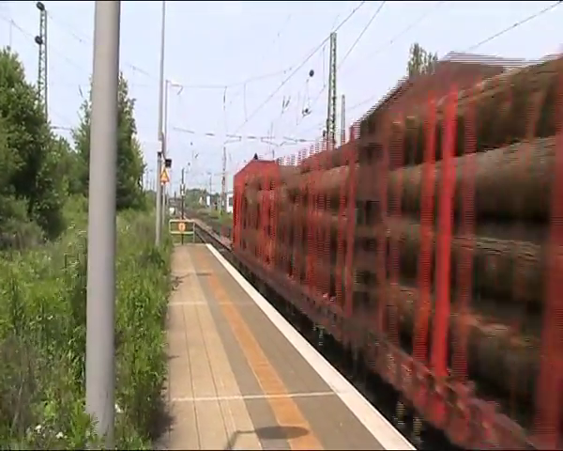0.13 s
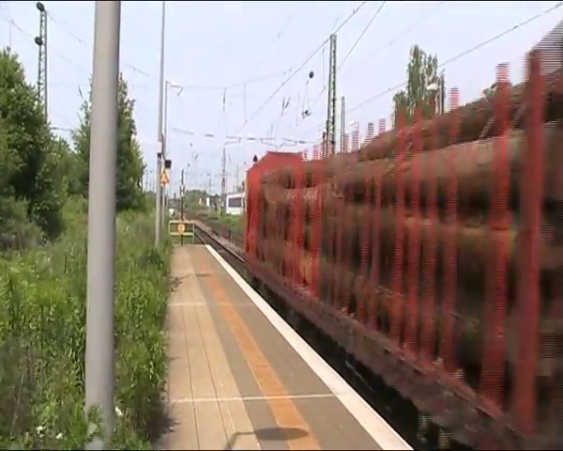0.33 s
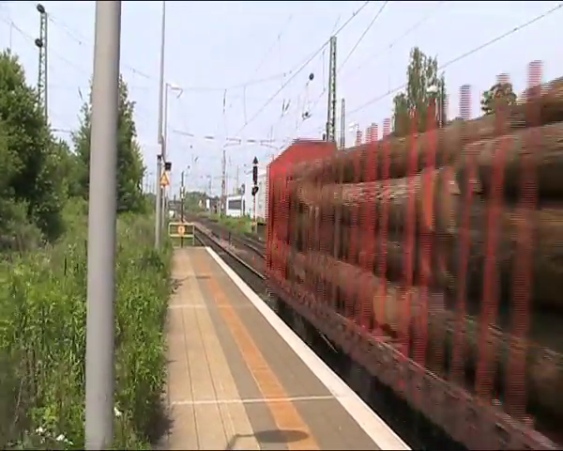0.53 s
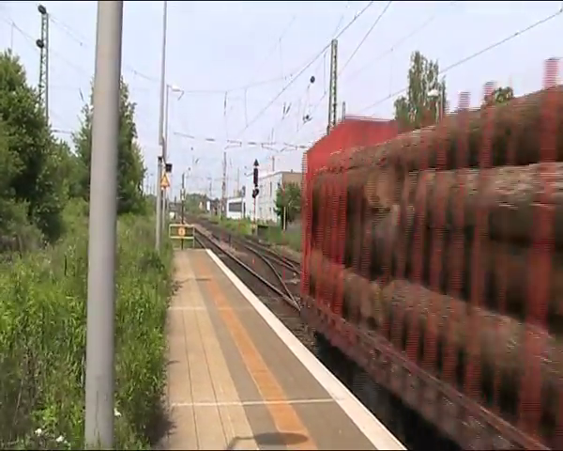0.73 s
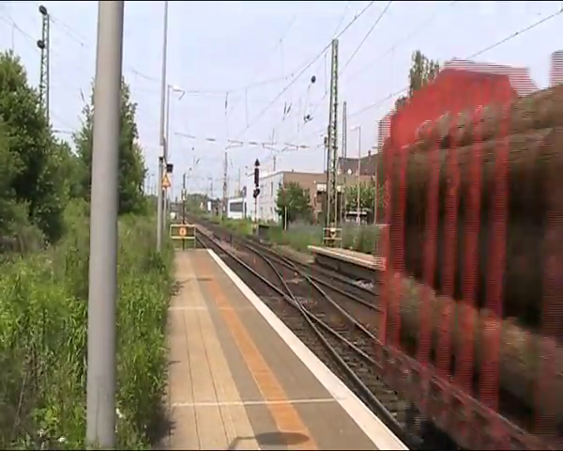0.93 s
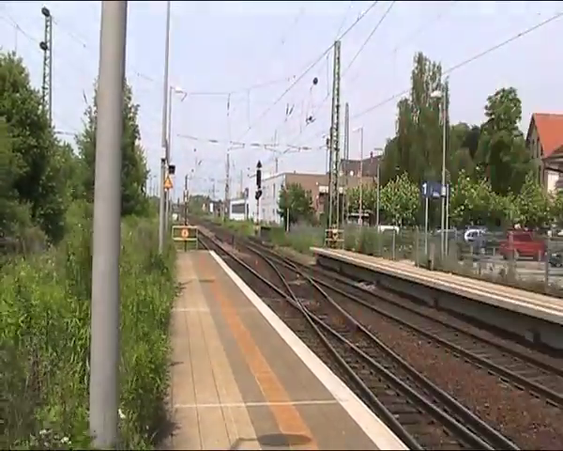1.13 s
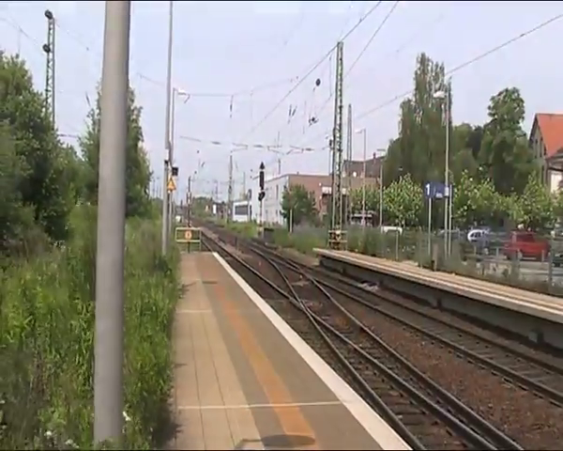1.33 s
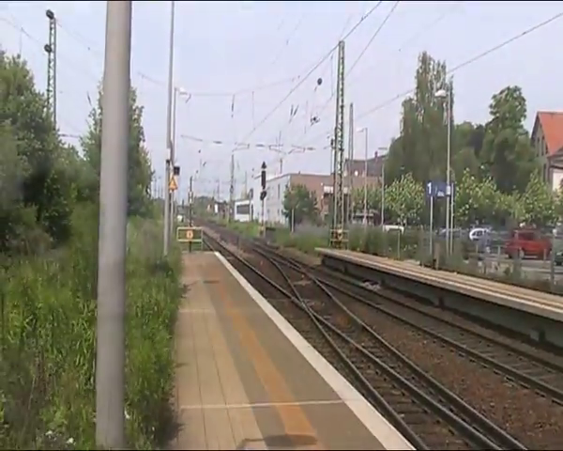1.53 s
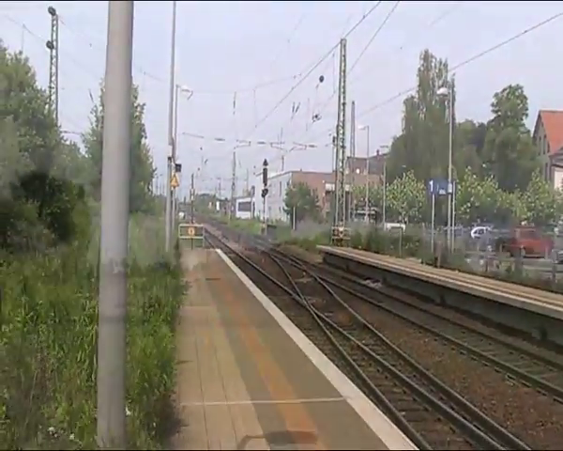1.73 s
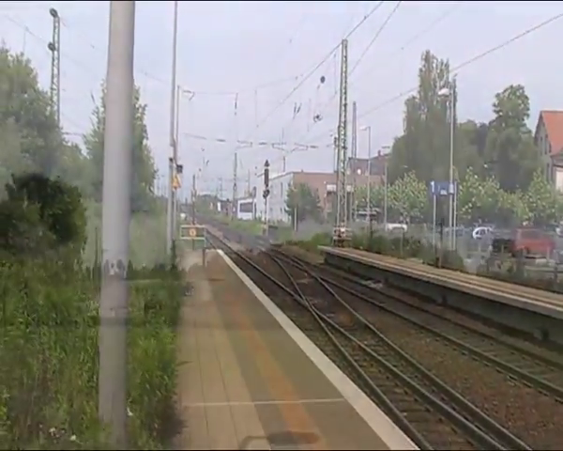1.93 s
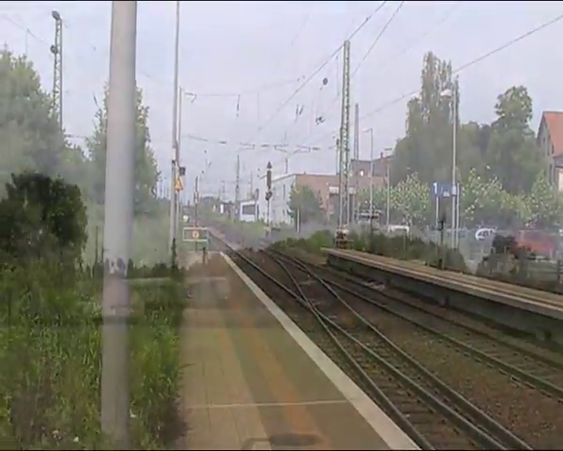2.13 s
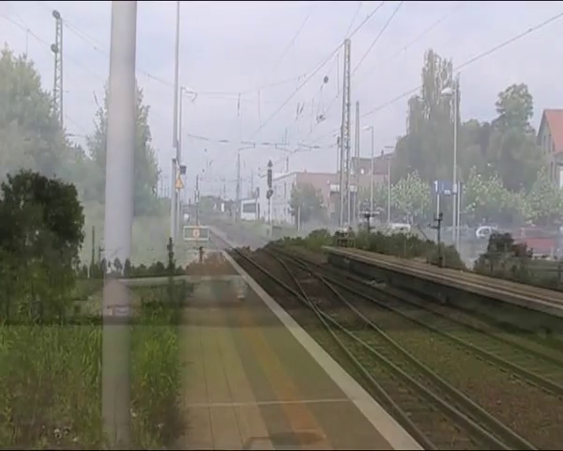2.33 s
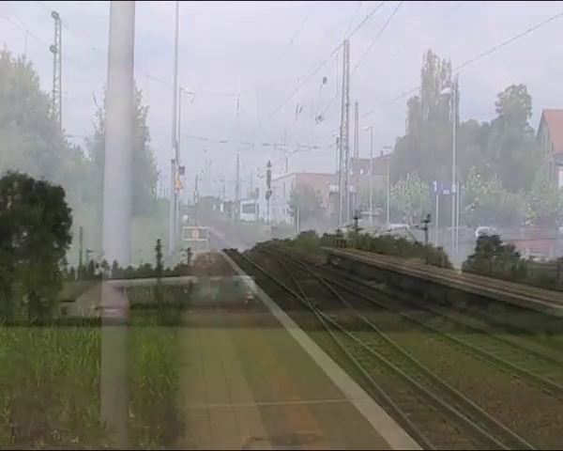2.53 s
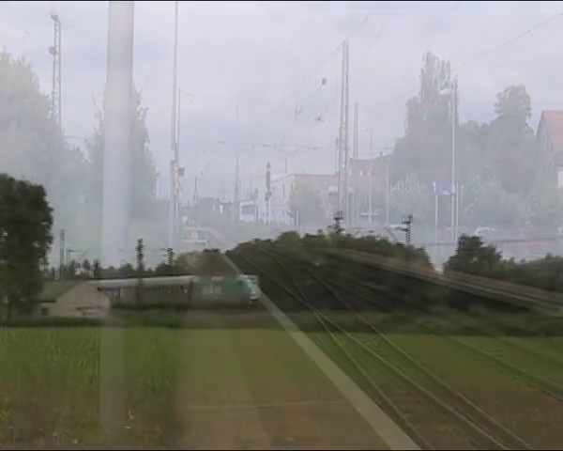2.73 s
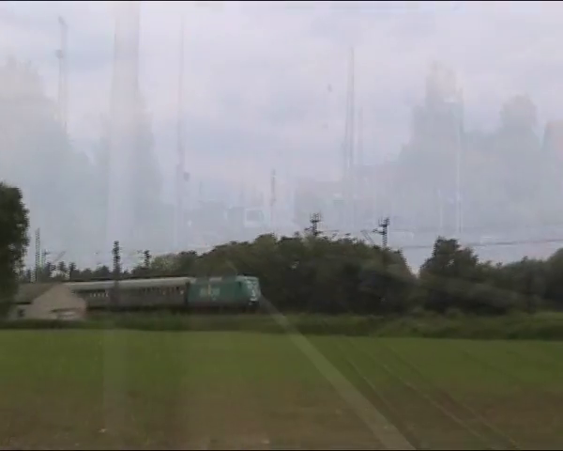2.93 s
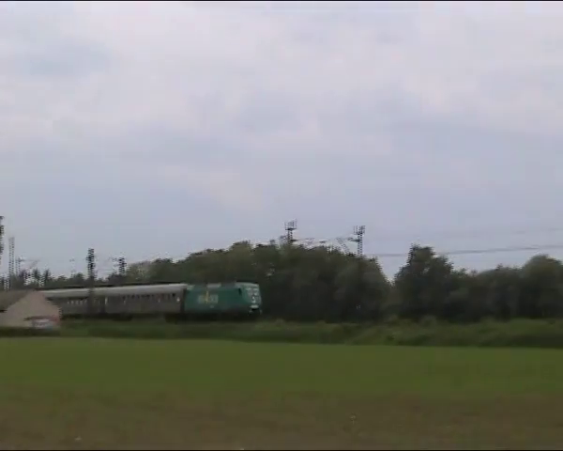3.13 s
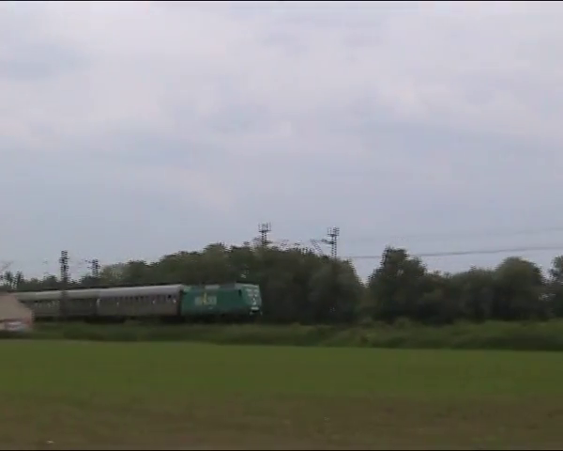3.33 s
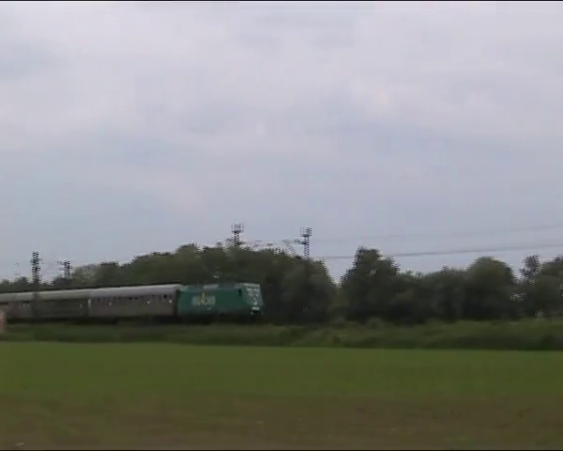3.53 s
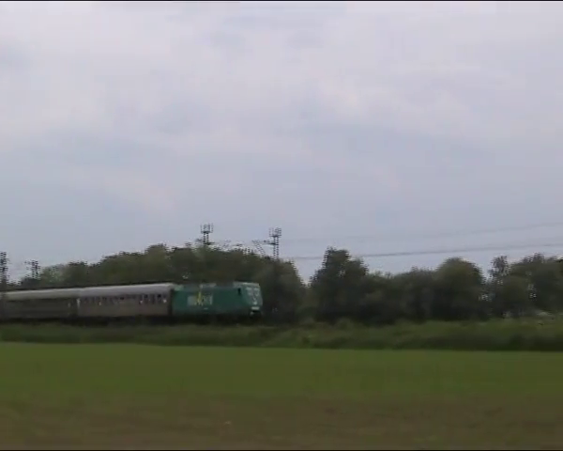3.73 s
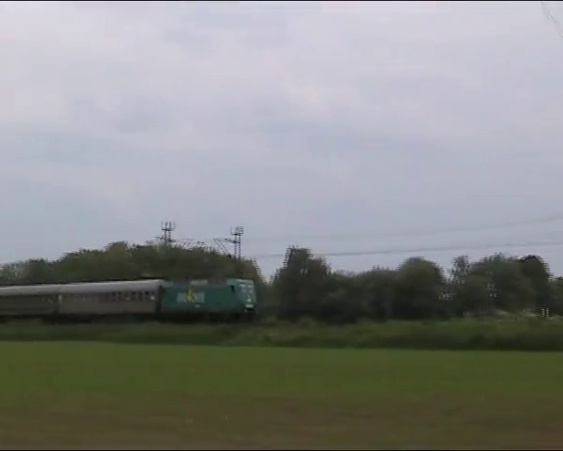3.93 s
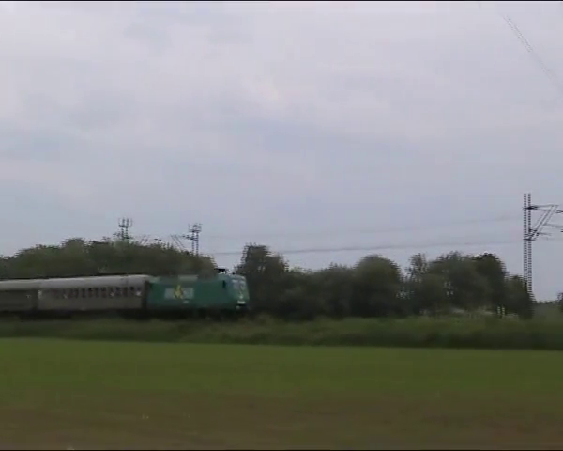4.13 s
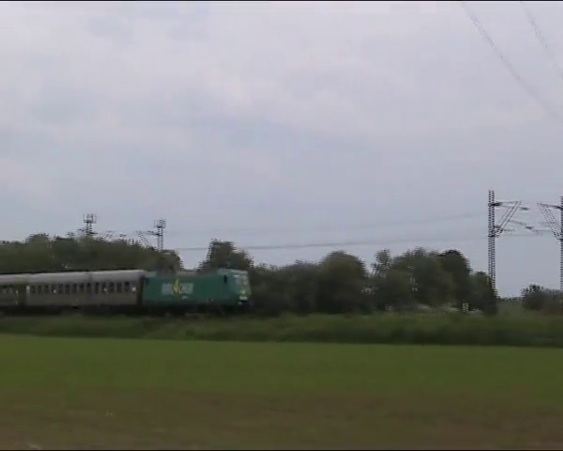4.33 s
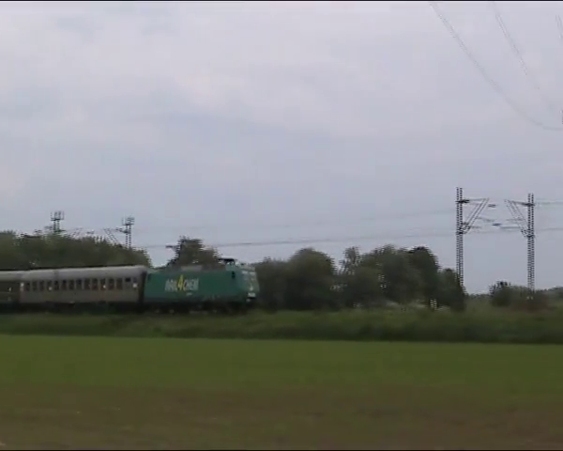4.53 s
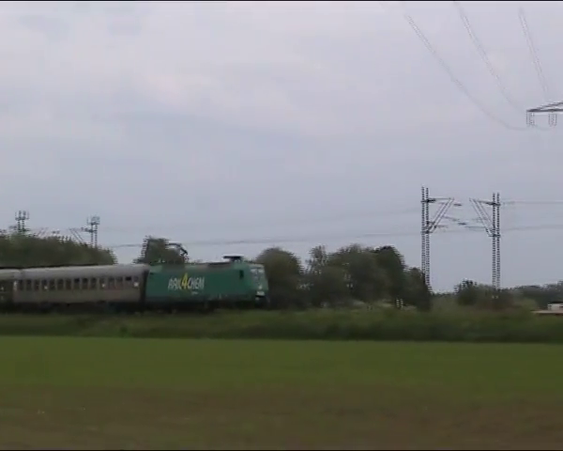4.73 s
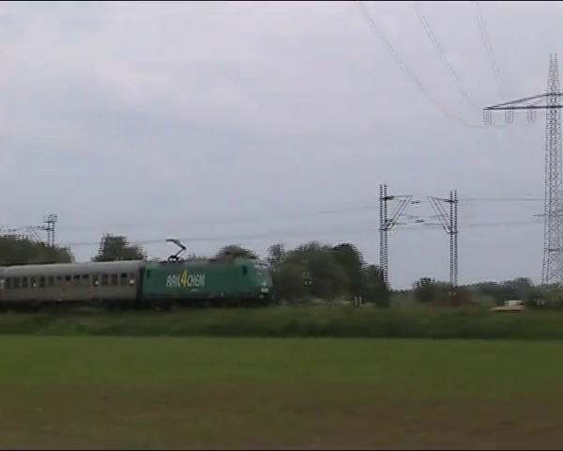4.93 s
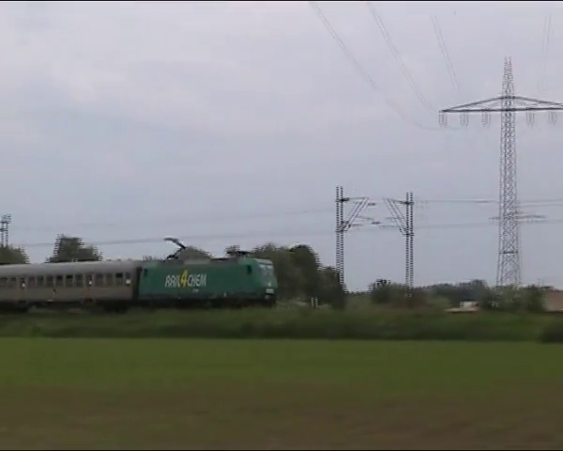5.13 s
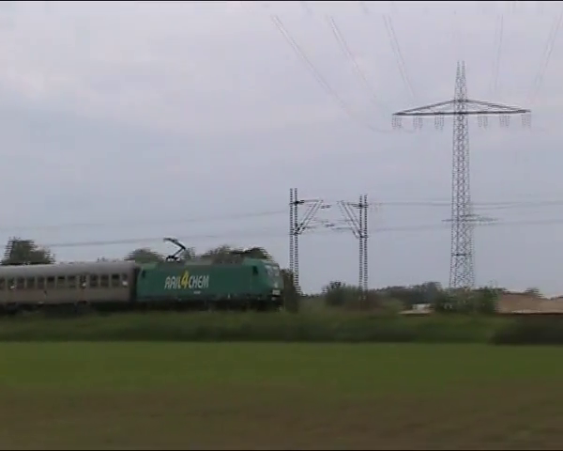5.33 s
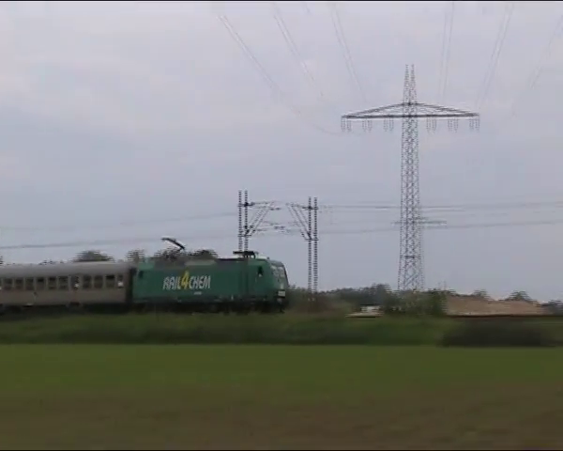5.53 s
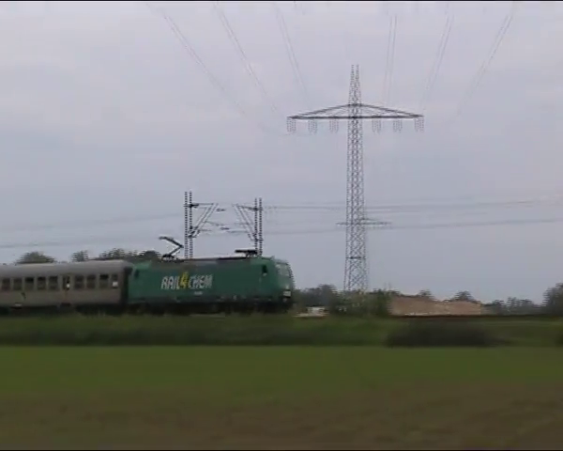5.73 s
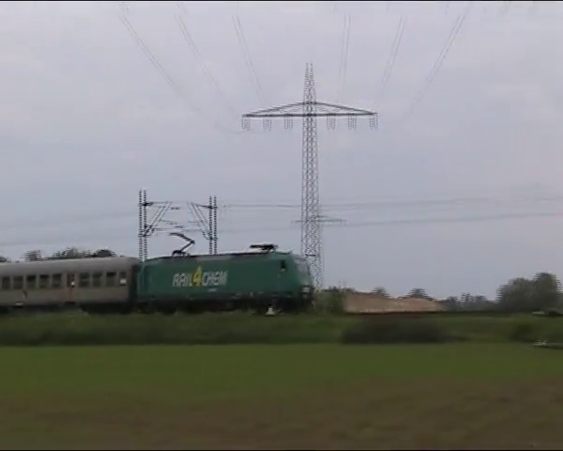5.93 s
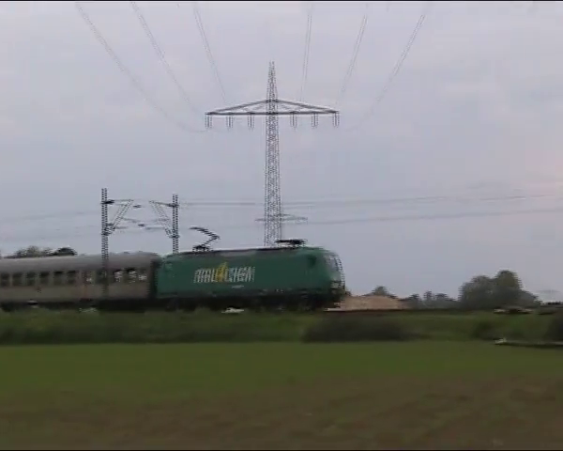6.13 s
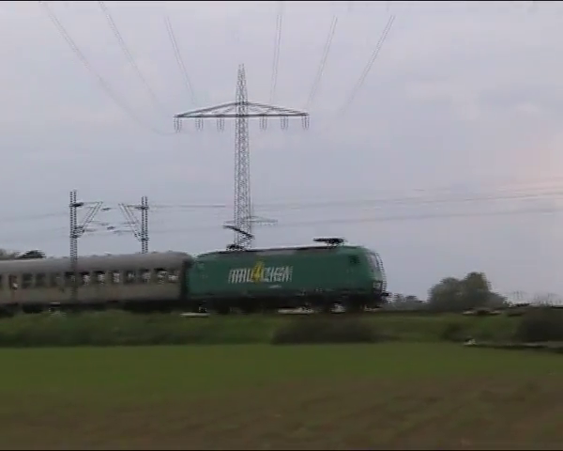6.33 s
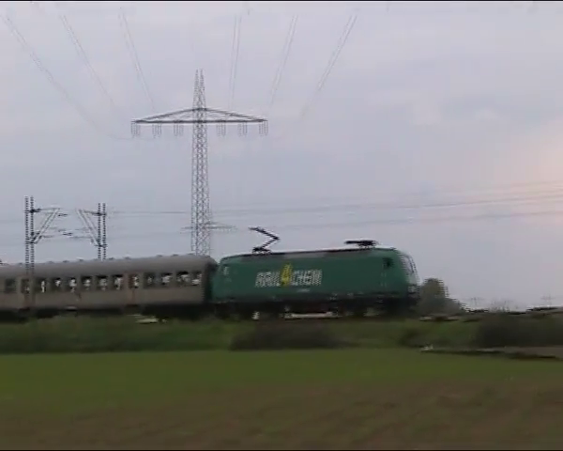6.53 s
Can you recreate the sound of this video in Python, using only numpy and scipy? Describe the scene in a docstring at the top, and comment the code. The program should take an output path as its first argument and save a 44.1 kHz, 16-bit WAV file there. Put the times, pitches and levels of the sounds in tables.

```python
"""Freight train at a platform, electric train across a field

The last timber wagons roll past a platform and away: rolling, clatter and flange noise that rise or dip briefly,
while their draught buffets the microphones. After a short dropout the platform fades into an open field, where
an electric train draws near from afar, noise through rail and wheel resonances over a dip that the soft ground
cuts into the low middle. Wind buffets and low thumps, faint cheeps, camera ticks and hiss lie around the trains."""
import sys
import numpy as np
from scipy import signal
from scipy.fft import rfft, irfft, next_fast_len
from scipy.io import wavfile
from scipy.ndimage import uniform_filter1d, map_coordinates

SR = 44100
rng = np.random.default_rng(int(sys.argv[2]) if len(sys.argv) > 2 else 0)


def transcribe(signal):
    """Save signal, clipped to [-1, 1], as a 16-bit WAV file at the path in sys.argv[1]."""
    frames = np.atleast_2d(signal).T
    limited = np.clip(frames, -1, 1)
    pcm = np.round(limited * 32767).astype(np.int16)
    wavfile.write(sys.argv[1], SR, pcm)


N = 290178
FADE_S = (1.2864, 3.28625)  # start and end of the even fade from platform to field, seconds
OPPOSED = np.array([[1], [-1]])  # signs at the left and right microphone


def freight(s):
    """Rough treads on rail, loose wagon parts and grinding flanges, each rising or dipping at moments."""
    # The passing train. Each row: time in seconds, rolling level in dB, rush above 850 Hz in dB,
    # wagon clatter level in dB, clatter sharpness above 6 kHz in dB, flange hiss level in dB.
    passage = [(0, -17.5, 3, -32.5, 10.5, -52), (.25, -14.5, 2.5, -28, 7, -50),
               (.42, -14.5, 2.5, -27, 10, -51), (.55, -16.5, 3, -27.5, 7, -51),
               (.85, -15.5, 0.5, -29, 9.5, -46), (1.1, -16, 2.5, -27, 6, -48),
               (1.47, -16.5, 2.5, -31, 5, -48), (1.57, -16, 0.5, -32.5, 2.5, -67),
               (1.95, -18.5, 3.5, -34.5, 5, -64), (2.2, -22.5, 3.5, -38.5, 1.5, -66.5),
               (2.5, -20, 3, -37, 2, -72), (3.28, -20.5, 0, -42, 0, -82)]
    # Moments of rise or dip, perhaps as wheel sets pass. Each row: time in seconds, length in seconds
    # (centre to 1/e), then changes in dB of the rush, the clatter and the flange hiss, up or down.
    moments = [(.05, .03, 0.5, 2.5, 7), (.28, 0.033, 0, 0.5, 5), (.36, .03, 6, 2, 1), (.44, .05, 3, 4, 2),
               (.59, 0.031, -1, 5, 2), (.67, 0.063, 1, 2, 13), (.88, 0.072, 1.5, -3.5, 5),
               (1.04, 0.023, 0, 1, 1), (1.24, 0.052, -1, 4.5, 0), (1.32, 0.071, 1, 2.5, 6),
               (1.42, .03, 0, 4.5, -2), (1.67, 0.092, 0.5, 5.5, 7), (1.97, .06, 0.5, 5, 9),
               (2.14, 0.074, 1.5, 3.5, -7), (2.46, 0.061, 4, 2.5, 3)]
    # Colours of rolling and clatter. Each row: frequency in Hz, density in dB per Hz.
    roll_colour = [(18, -43), (30, -15), (80, -7.5), (275, -8), (572, 0), (1390, -17), (1620, -20.5),
                   (1780, -19.5), (2040, -29.5), (3000, -29.5), (3900, -35), (6600, -120)]
    clatter_colour = [(500, -27.5), (1200, -6), (1800, 1.5), (2600, -0.5), (4600, -7.5), (7200, -16),
                      (9500, -24.5), (12600, -29.5), (15500, -41)]
    # Flange resonances. Each row: frequency in Hz, width in Hz, level in dB.
    flange_modes = [(10280, 240, -6), (13850, 1300, -10), (14050, 300, -19)]
    # Stereo width. Each row: frequency in Hz, part that differs between the microphones in dB.
    wide_curve = [(60, -2), (200, -2), (380, -12), (700, -16), (1300, -12), (2400, -8), (4400, -6),
                  (8000, -5), (15000, -3)]
    # Stereo balance. Each row: frequency in Hz, left minus right in dB.
    pan_curve = [(60, -1.5), (110, 0), (200, -2), (380, 0.0), (700, 0), (1290, -1.5), (2380, -3.5),
                 (4400, -6), (8120, -2.5), (15000, 0)]
    # Stereo lag. Each row: frequency in Hz, radians by which the left lags.
    lag_curve = [(100, 0), (700, .2), (2150, .75), (4300, 1.1), (9000, 1.0), (13200, 1.8), (15500, 2.2)]

    def at_microphones(grit_db):
        return spread(undb(grit_db)[0], wide_curve, pan_curve, lag_curve)

    roll_db, rush_db, clatter_db, sharp_db, flange_db = over_time(passage, s)
    rush_change, clatter_change, flange_change = bumps(moments, s)

    roll = coloured(at_microphones(1.1 * walk(40.07)), roll_colour)
    roll = patchy(roll, 0.5, 8.2, [(rush_db + rush_change, 700, 950)])

    # stanchions and couplings rattle in dense, uneven bursts
    rattle_db = 0.8 * walk(30.4) + 0.74 * walk(400)
    clatter = coloured(at_microphones(rattle_db), clatter_colour)
    clatter = patchy(clatter, 0.81, 12, [(sharp_db, 5000, 8000)])

    grind_db = 2.2 * walk(60) + 1.4 * walk(15.4)
    flange = unit(filtered(at_microphones(grind_db), ring(flange_modes)))

    roll = roll * undb(roll_db)
    clatter = clatter * undb(clatter_db + clatter_change)
    return roll + clatter + flange * undb(flange_db + flange_change)


def far_train(s):
    """Many wheels far off: a smooth rush whose rail and wheel resonances come and go with the air."""
    # The approach. Each row: time in seconds, rolling level in dB, low rail ring level in dB, rumble level
    # in dB, then tilts in dB: brightness above 2.5 kHz, fullness below 800 Hz, air above 7 kHz.
    approach = [(1.29, -32, -33, -50, 10, 0, 3), (2.2, -32, -27, -46, 4, -4, 7),
                (2.85, -26.5, -35, -36.5, 3, 2, -3), (3.05, -22, -33.5, -38, -1, -0.5, 0),
                (3.4, -22, -37, -41.5, 0, 0, -1), (3.7, -22, -34, -42.5, 0, 0.5, 0.5),
                (3.95, -21.5, -31.5, -42.5, -1.5, -1, 2), (4.2, -19, -30.5, -39.5, -4, 1, 1.5),
                (4.5, -20.5, -25.5, -38.5, 0.5, 4, 4.5), (4.7, -17.5, -21.5, -39.5, -2, -1, 4),
                (4.95, -17.5, -21, -35, -1, -2, 5), (5.25, -16, -25.5, -37, -2, -3.5, 3),
                (5.58, -15.5, -28, -36.5, -2, -4.5, 2), (5.75, -16.5, -21.5, -35, -1, -5.5, 1),
                (5.97, -18, -23, -33.5, -1.5, -3, 6), (6.15, -16, -29, -27.5, -1, -3.5, 1),
                (6.4, -18.5, -21.5, -33, 0, -1, 8), (6.58, -16.5, -26, -35, 1, -1.5, 8)]
    # Brief surges of the rolling. Each row: time in seconds, length in seconds (centre to 1/e), lift in dB.
    surges = [(3.15, 0.033, 1), (3.468, 0.01, 1.5), (3.553, 0.0096, 2), (4.12, 0.025, 3),
              (5.21, 0.032, 0.5), (6.07, 0.04, 2)]
    # Wheel ring over the rush. Each row: time in seconds, change in dB.
    ring_change = [(2.5, 2.5), (3.6, 1), (4.3, -2), (4.7, -0.5), (6.58, 0)]
    # Colours of rolling and rumble. Each row: frequency in Hz, density in dB per Hz.
    roll_colour = [(110, -52), (180, -18.5), (310, -24), (400, -18.5), (600, -9), (810, -10), (900, -8),
                   (1110, -4.5), (1820, -3.5), (2100, -10.5), (2450, -12.5), (3500, -22), (4000, -30),
                   (5900, -32.5), (9000, -51.5), (15500, -83)]
    rumble_colour = [(18, -44), (30, 5.5), (60, 10), (100, 15), (140, 11.5), (200, 0), (400, -41),
                     (900, -89)]
    # Resonances of rail and wheels. Each row: frequency in Hz, width in Hz, level in dB.
    rail_modes = [(900, 56, -3.5), (961, 135, -6)]
    wheel_modes = [(1238, 84, -8.5), (1534, 130, -20), (1681, 96, -17.5), (1850, 120, -20),
                   (2313, 240, -16.5), (4230, 300, -32), (5140, 450, -37)]
    # Stereo width. Each row: frequency in Hz, part that differs between the microphones in dB.
    wide_curve = [(60, -28), (110, -22.5), (200, -13.5), (380, -23), (700, -32.5), (1290, -20.5),
                  (2380, -11.5), (4400, -9), (8120, -13), (15000, -14.5)]

    def at_microphones():
        return spread(undb(0.52 * walk(60))[0], wide_curve)

    roll_db, rail_db, rumble_db, bright_db, full_db, air_db = over_time(approach, s)
    ring_db = over_time(ring_change, s)[0]

    wheels = coloured(at_microphones(), roll_colour)
    for mode, sway in zip(wheel_modes, walk(4.2, count=len(wheel_modes))):
        tone = unit(filtered(at_microphones(), ring([mode])))
        wheels = wheels + undb(mode[2] + ring_db + 1.6 * sway) * tone
    tilts = [(bright_db, 2000, 2800), (full_db, 860, 740), (air_db, 6000, 9000)]
    wheels = patchy(wheels, 0.69, 7.4, tilts) * undb(roll_db + bumps(surges, s)[0])

    rail = unit(filtered(at_microphones(), ring(rail_modes))) * undb(rail_db + 1.9 * walk(9.7)[0])
    rumble = coloured(at_microphones(), rumble_colour) * undb(rumble_db + 1.5 * walk(7)[0])
    return wheels + rail + rumble


def wind(s, platform):
    """Each buffet swells and dies with unrelated eddies per microphone; the train's draught sways in between."""
    # Single wind buffets, loud and faint. Each row: time in seconds, level in dB, length in seconds,
    # rasp above 300 Hz relative to the body in dB, left minus right in dB.
    buffets = [(0.08, -20, 0.04, -18, 1), (0.604, -27, 0.016, 3, -3), (1.3, -26, 0.034, -6, 8),
               (1.575, -26, 0.022, -4, 7), (1.82, -25, 0.02, -4, -1), (2.192, -24, 0.024, 5, -2),
               (2.34, -27, .04, -16, 1), (2.545, -26, 0.048, -2, 1), (2.675, -30, 0.048, -5, -2),
               (2.867, -37, 0.021, -2.5, 3), (4.303, -40, .026, -17, -7), (4.359, -34, 0.0091, 8.5, -8),
               (5.86, -29, 0.013, 6, -4), (5.901, -28.5, .02, 3, -7.5), (5.97, -35.5, .02, -6, -7),
               (6.129, -28, 0.044, 5, -4.5), (6.188, -29, 0.017, 0, -3), (6.277, -26.5, 0.024, -2, -5),
               (6.434, -39, .02, -1, 2)]
    # Colours of body and rasp. Each row: frequency in Hz, density in dB per Hz.
    body_colour = [(20, -20), (60, -3), (110, 6.5), (200, 2), (300, -5), (600, -35), (1500, -93)]
    rasp_colour = [(80, -53), (150, -1.5), (300, 0), (450, -9.5), (700, -14), (1200, -53), (2500, -101)]
    draught_db, draught_sway_db, draught_rasp_db, draught_per_s = -31, 4, -16, 14
    centre_db = -6.5  # the stereo matrix weakens the centre of whatever is unrelated

    body = platform * undb(draught_db + draught_sway_db * walk(draught_per_s, count=2))
    rasp = body * undb(draught_rasp_db)
    for at, db, length, rasp_db, pan_db in buffets:
        near = slice(max(int((at - .25) * SR), 0), int((at + .25) * SR))
        swell = undb(db + OPPOSED * pan_db / 2) / np.cosh(1.6 * (s[near] - at) / length)
        body[:, near] += swell
        rasp[:, near] += swell * undb(rasp_db)
    return body * unrelated(body_colour, centre_db) + rasp * unrelated(rasp_colour, centre_db)


def wind_thumps(s):
    """Low wind thumps in the centre, each a short damped low tone; higher ones die sooner."""
    # Each row: time in seconds, level in dB before rise and decay, pitch in Hz.
    thump_rows = [(1.941, -12.5, 286), (2.09, -17.5, 406), (4.352, -26, 220), (5.855, -18.5, 299),
                  (6.124, -19.5, 102), (6.272, -21, 115), (6.29, -16, 690), (6.38, -19, 506)]
    t60_s, t60_slope = 0.12, -0.34  # 60 dB decay at 300 Hz, and its power of pitch
    thumps = 0
    for at, db, hz in thump_rows:
        envelope = after(s, at, 0.0015, t60_s * (hz / 300) ** t60_slope)
        thumps = thumps + undb(db) * envelope * np.sin(2 * np.pi * hz * (s - at))
    return thumps


def bird(s):
    """Faint, short near-sine cheeps under bell-shaped envelopes."""
    # Each row: time in seconds, level in dB.
    cheeps = [(3.2, -40), (3.28, -47), (3.35, -44), (3.5, -45), (3.573, -36)]
    pitch_hz, length_s = 5190, 0.0084  # length from centre to 1/e
    envelope = sum(undb(db) * np.exp(-((s - at) / length_s) ** 2) for at, db in cheeps)
    return envelope * np.sin(2 * np.pi * pitch_hz * s)


def camera(s):
    """Drive ticks in threes, noise bursts felt mostly oppositely by the two microphones, and microphone hiss."""
    # First tick of each three, in seconds.
    first_ticks = [3.723, 4.816, 6.257]
    # The three ticks. Each row: seconds after the first, level in dB before rise and decay.
    pattern = [(0, -55), (.0907, -45), (.1585, -44)]
    # Colours of ticks and hiss. Each row: frequency in Hz, density in dB per Hz.
    tick_colour = [(2500, -29), (4500, -5), (5800, -5), (7500, -11), (12500, -9), (15500, -16)]
    hiss_colour = [(1000, -10), (4500, -6), (9000, -10), (15500, -19.5)]
    hiss_db = -61
    ticks = sum(undb(db) * after(s, at + late, .0006, .06) for at in first_ticks for late, db in pattern)
    return ticks * unrelated(tick_colour, -11) + undb(hiss_db) * unrelated(hiss_colour, -9.0)


def spread(grit, wide, pan=((1, 0), (2, 0)), lag=((1, 0), (2, 0))):
    """Shared noise with lag and balance, plus an unlike part from the long source and its echoes."""
    mid, side = rng.standard_normal((2, N)) * grit

    def balance_and_lag(hz):
        gain = undb(OPPOSED * over_hz(pan, hz) / 2)
        return gain * np.exp(-.5j * OPPOSED * over_hz(lag, hz))

    shared = filtered(mid, balance_and_lag)
    return shared + OPPOSED * filtered(side, lambda hz: undb(over_hz(wide, hz)))


def unrelated(spectrum, centre_db):
    """Coloured noise from independent middle and opposed parts, the middle set to centre_db."""
    mid, side = rng.standard_normal((2, N))
    return coloured(undb(centre_db) * mid + OPPOSED * side, spectrum)


def patchy(x, patch_db, rate, shelves):
    """Bands swell alone and blend into neighbours; each shelf (dB curve, from Hz, to Hz) tilts one end."""
    frame = 512  # samples
    hz, s, z = signal.stft(x, SR, nperseg=frame)
    frames = np.minimum((s * SR).astype(int), N - 1)
    bands = 60 * 2 ** np.arange(0, 8.5, .5)  # half octaves, Hz
    own = walk(rate, count=len(bands))[:, frames]
    place = np.interp(np.log(hz + 1), np.log(bands), np.arange(len(bands)))
    grid = np.meshgrid(place, np.arange(len(s)), indexing="ij")
    db = patch_db * map_coordinates(own, grid, order=1)
    for tilt_db, from_hz, to_hz in shelves:
        slope = np.clip(np.log((hz + 1) / from_hz) / np.log(to_hz / from_hz), 0, 1)
        db += slope[:, None] * tilt_db[frames]
    return signal.istft(z * undb(db), SR, nperseg=frame)[1][..., :N]


def ring(modes):
    """Sum of steep resonances (Hz, width Hz, dB) as a response."""
    def response(hz):
        return sum(undb(db) / (1 + 1j * (hz ** 2 - f ** 2) / ((hz + 1) * width)) ** 2
                   for f, width, db in modes)
    return response


def coloured(x, spectrum):
    """Give x a (Hz, dB) spectrum at rms 1."""
    return unit(filtered(x, lambda hz: undb(over_hz(spectrum, hz))))


def filtered(x, response):
    """Apply response(Hz) to the last axis."""
    size = next_fast_len(N)
    hz = np.arange(size // 2 + 1) * SR / size
    return irfft(rfft(x, size) * response(hz), size)[..., :N]


def walk(rate, count=1):
    """Smooth random curves of rms 1 that change about rate times a second."""
    k = int(SR / rate)
    held = np.repeat(rng.standard_normal((count, N // k + 1)), k, axis=1)[:, :N]
    return unit(uniform_filter1d(uniform_filter1d(held, k), k))


def bumps(table, s):
    """Sum of bell-shaped rises or dips for each dB column of rows (s, length s, dB, ..)."""
    return sum(np.array(row[2:], float)[:, None] * np.exp(-((s - row[0]) / row[1]) ** 2) for row in table)


def after(s, at, rise, t60):
    """A quick rise at time `at` and an exponential decay, both in seconds."""
    age = np.maximum(s - at, 0)
    return (1 - np.exp(-age / rise)) * undb(-60 * age / t60)


def over_hz(table, hz):
    """Read a (Hz, value) table on a log-frequency axis."""
    t = np.array(table, float)
    return np.interp(np.log(hz + 1), np.log(t[:, 0]), t[:, 1])


def over_time(table, s):
    """All columns of a curve table at times s."""
    t = np.array(table, float)
    return [np.interp(s, t[:, 0], c) for c in t.T[1:]]


def unit(x):
    """Scale to rms 1."""
    return x / np.sqrt(np.mean(x ** 2))


def undb(db):
    """dB to gain."""
    return 10 ** (np.asarray(db) / 20)


def scene():
    """The platform fades out while the field fades in; wind, thumps, bird and camera are added."""
    s = np.arange(N) / SR
    field = np.interp(s, FADE_S, [0, 1])
    platform = 1 - field
    trains = freight(s) * platform + far_train(s) * field
    return trains + wind_thumps(s) + wind(s, platform) + bird(s) + camera(s)


def record(dry):
    """The sound drops out briefly, ticks once where the fade ends, and loses its top."""
    dropout_start_s, dropout_end_s, dropout_db = 1.2586, 1.2864, -40
    tick_db, top_hz = -19.5, 15780
    s = np.arange(N) / SR
    # the dropout's edges ramp over 0.4 ms
    out = np.clip(np.minimum(s - dropout_start_s, dropout_end_s - s) / .0004, 0, 1)
    age = s - FADE_S[1]
    tick = undb(tick_db) * np.sinc(age / 4e-5) * np.exp(-(age / 1e-4) ** 2)
    top = signal.ellip(14, .3, 70, top_hz, fs=SR, output="sos")
    return signal.sosfilt(top, dry * undb(dropout_db * out) + tick)


dry = scene()
out = record(dry)
transcribe(out)
```